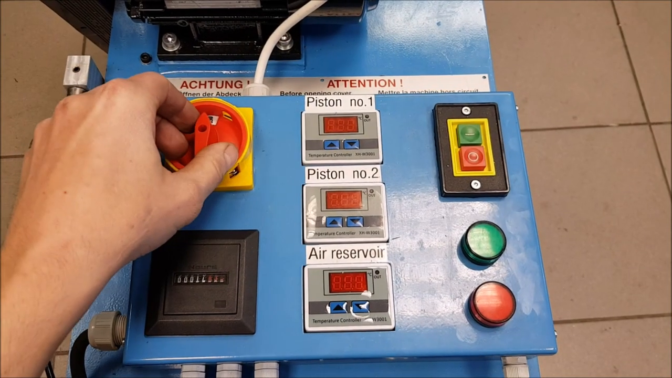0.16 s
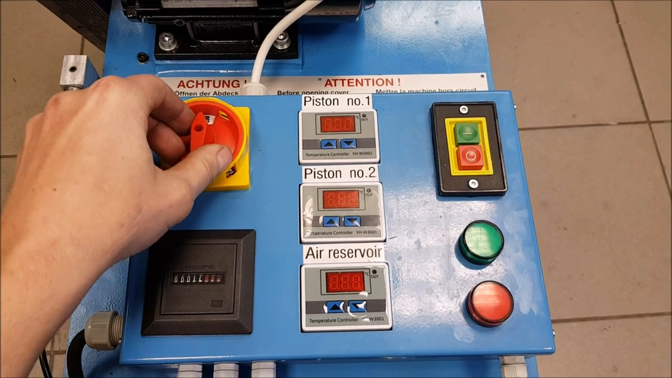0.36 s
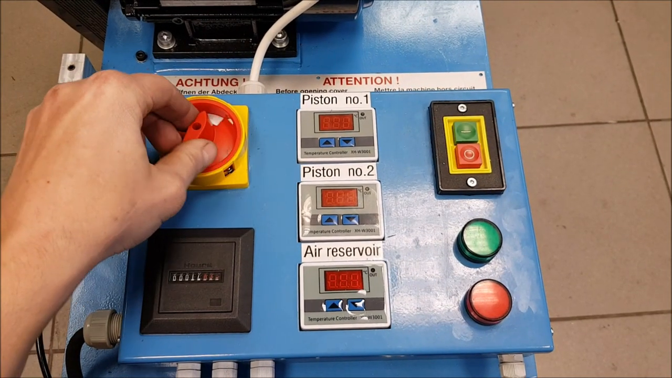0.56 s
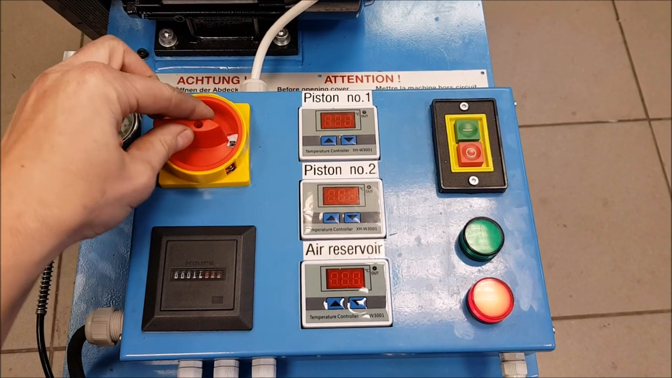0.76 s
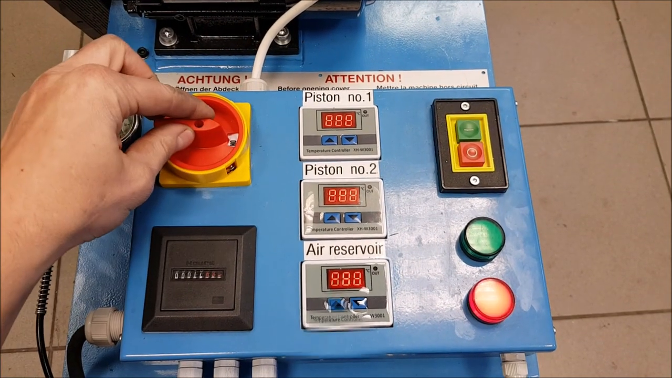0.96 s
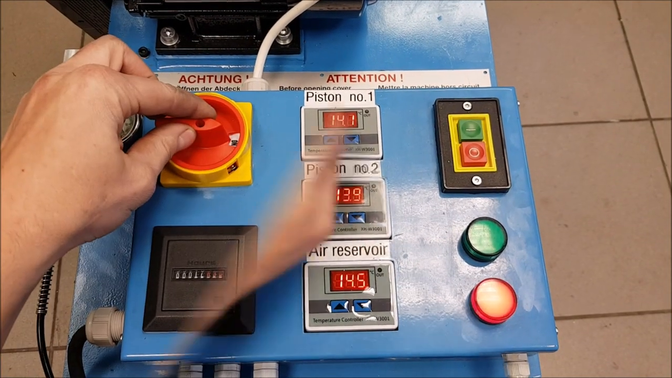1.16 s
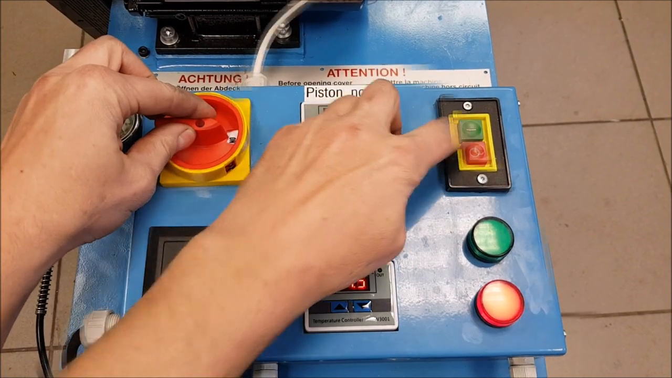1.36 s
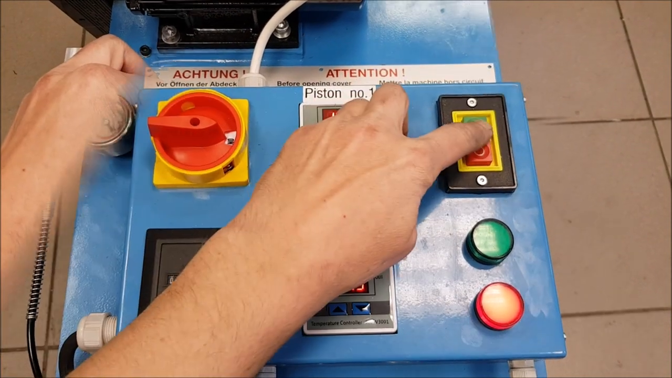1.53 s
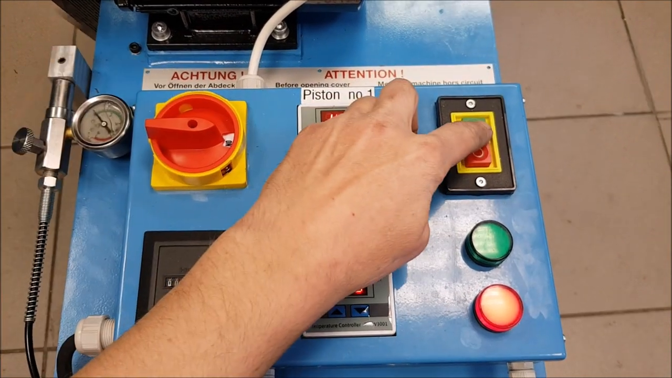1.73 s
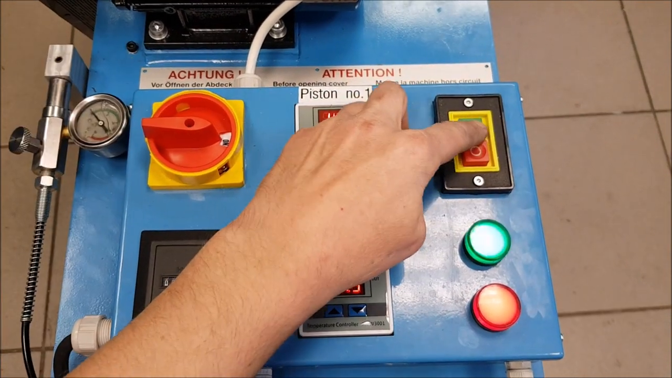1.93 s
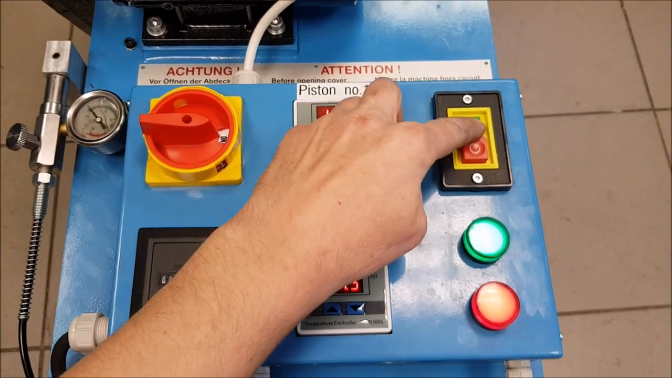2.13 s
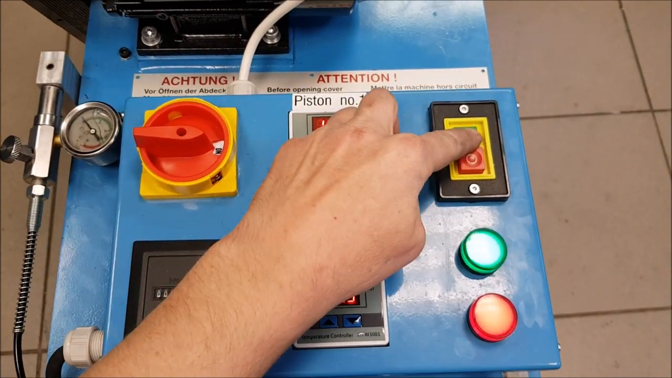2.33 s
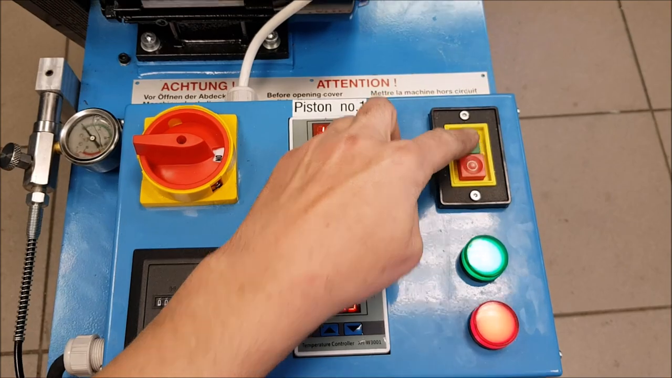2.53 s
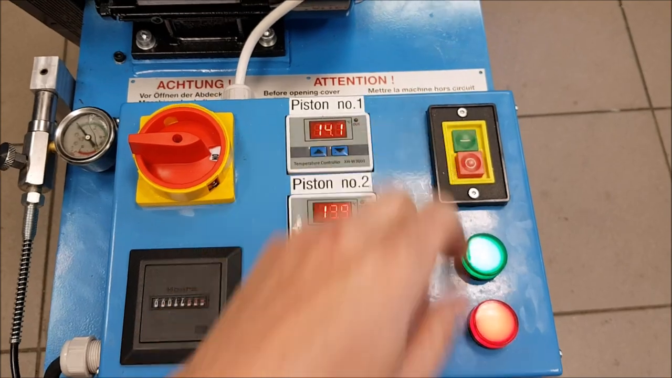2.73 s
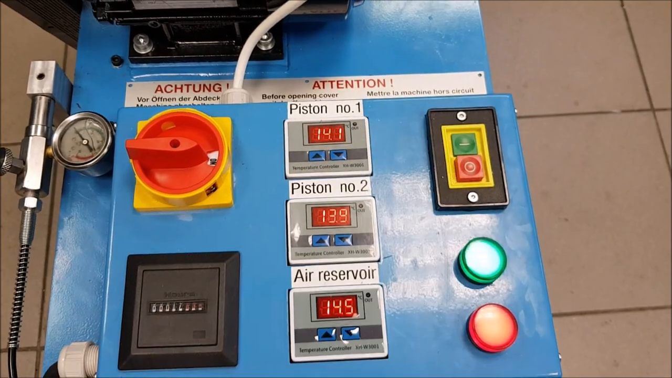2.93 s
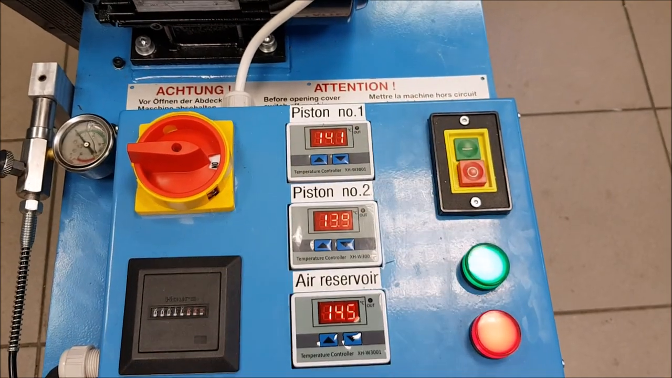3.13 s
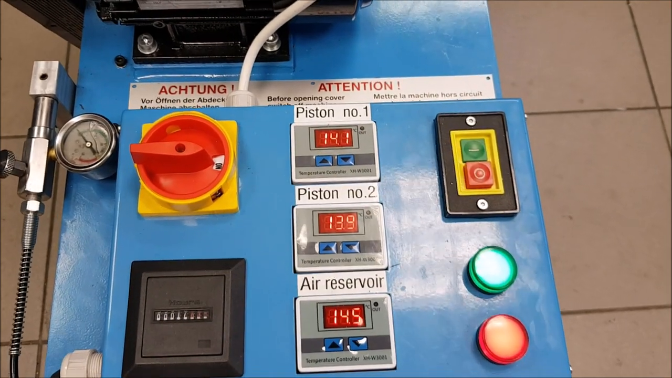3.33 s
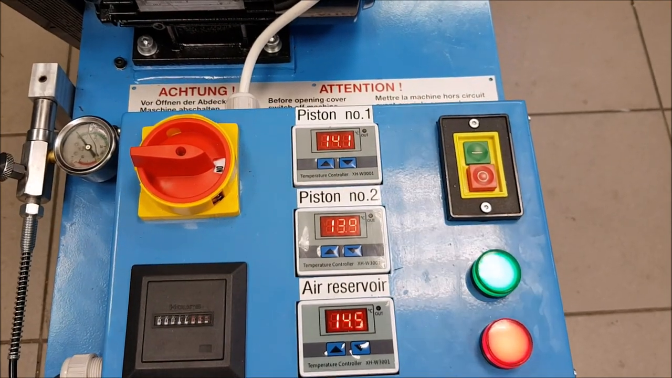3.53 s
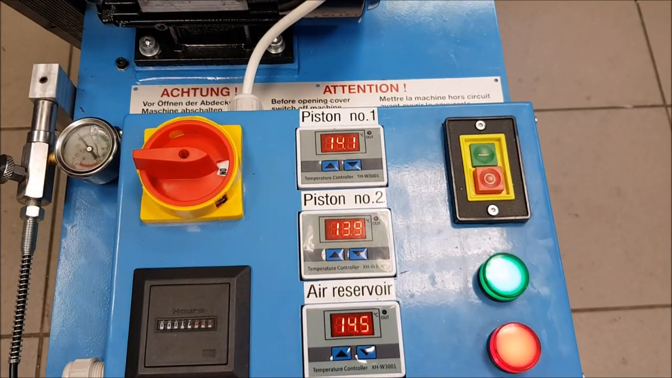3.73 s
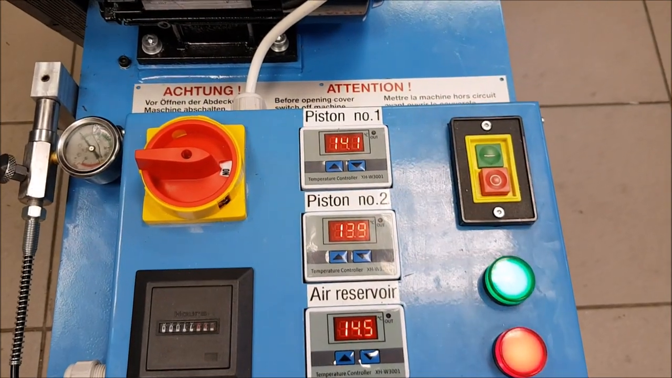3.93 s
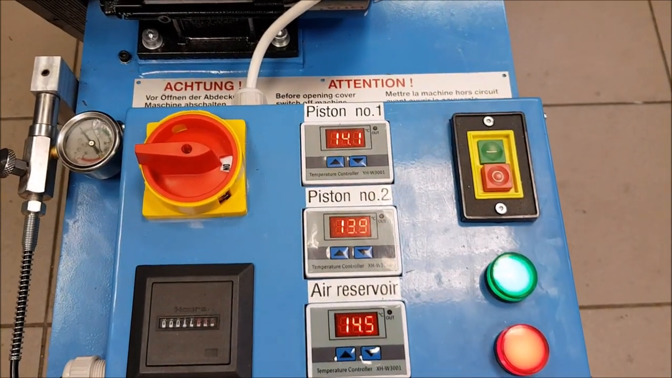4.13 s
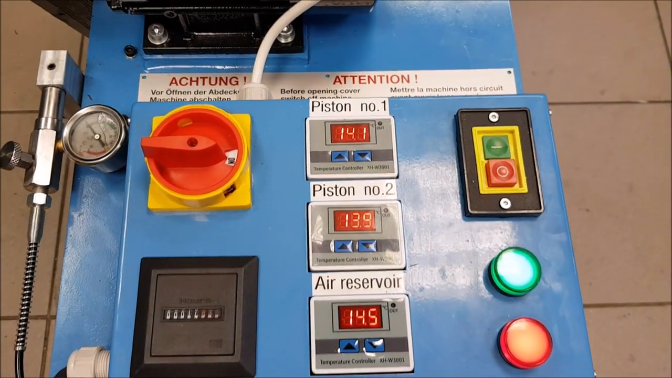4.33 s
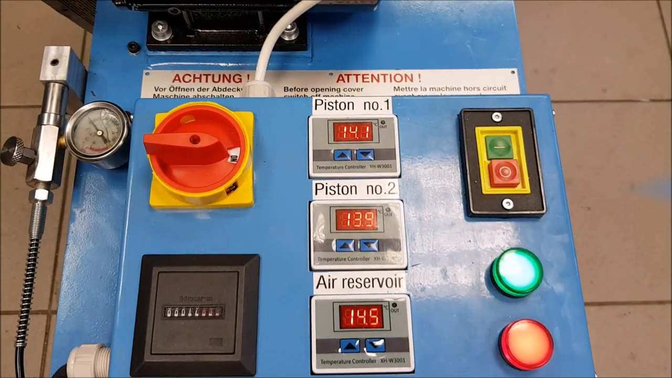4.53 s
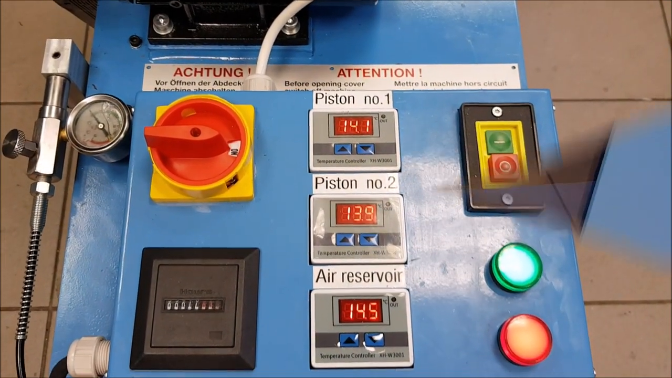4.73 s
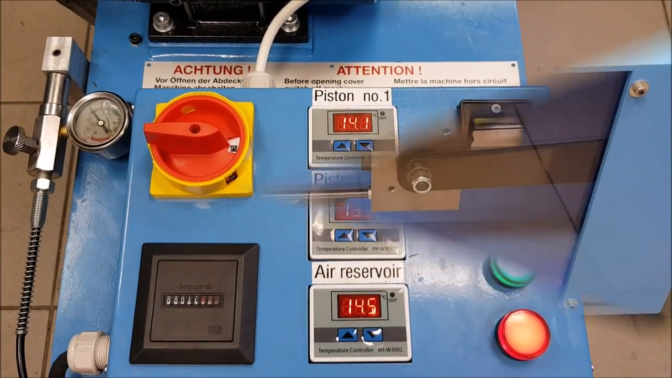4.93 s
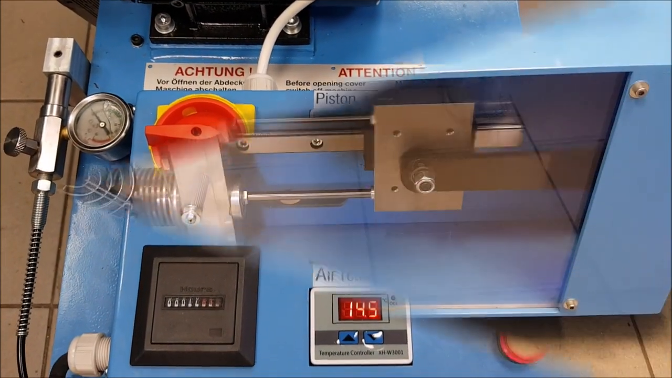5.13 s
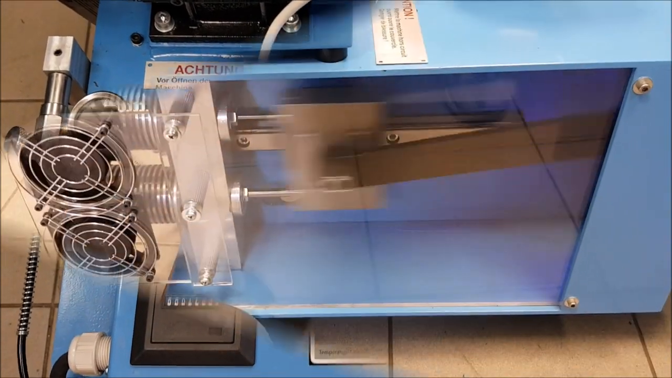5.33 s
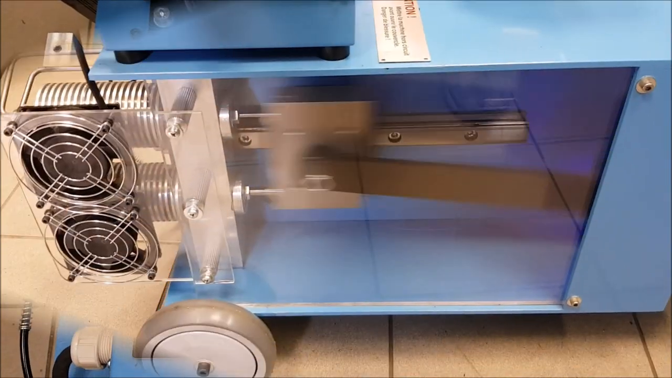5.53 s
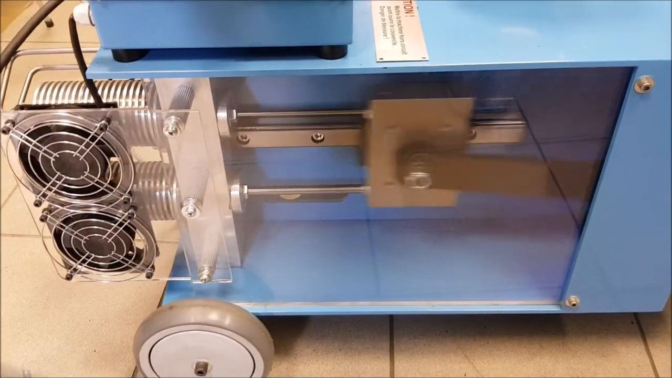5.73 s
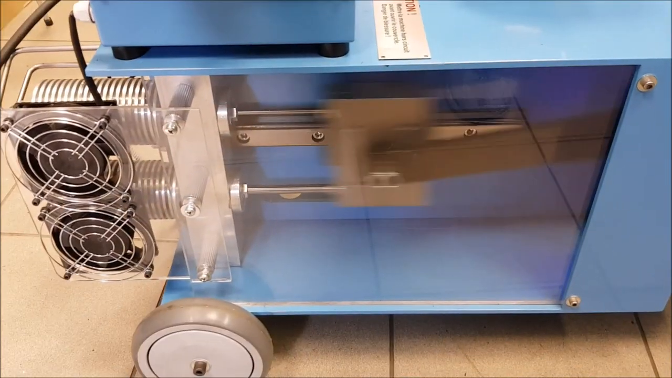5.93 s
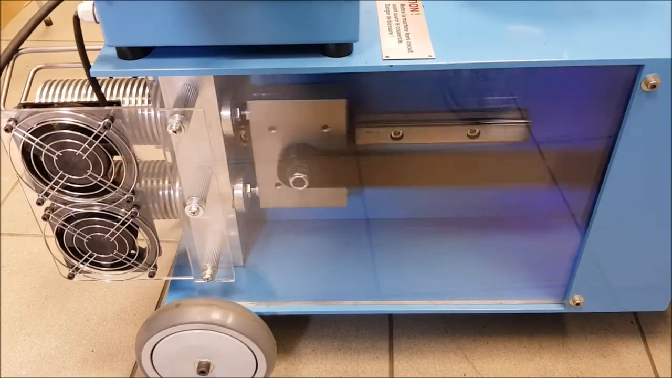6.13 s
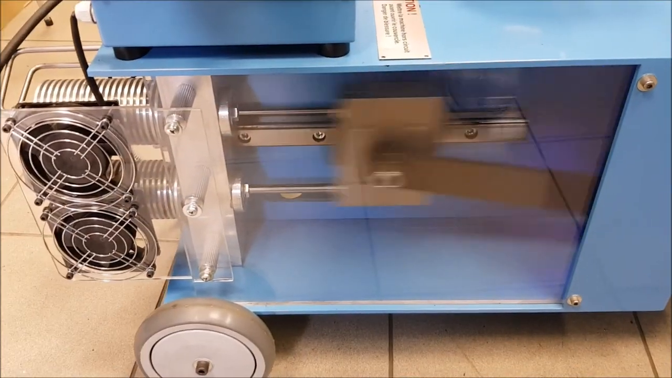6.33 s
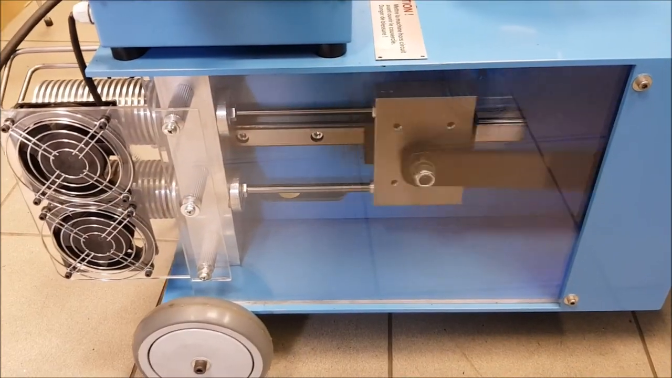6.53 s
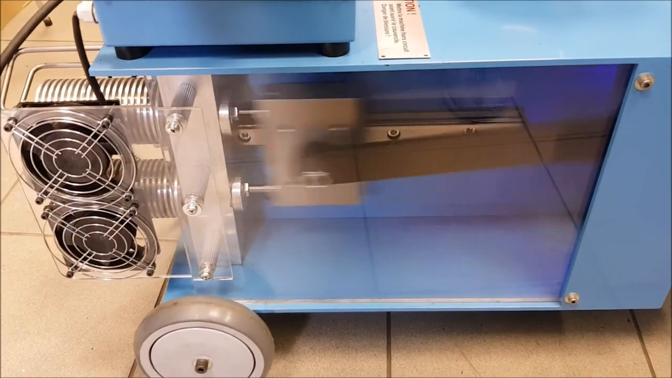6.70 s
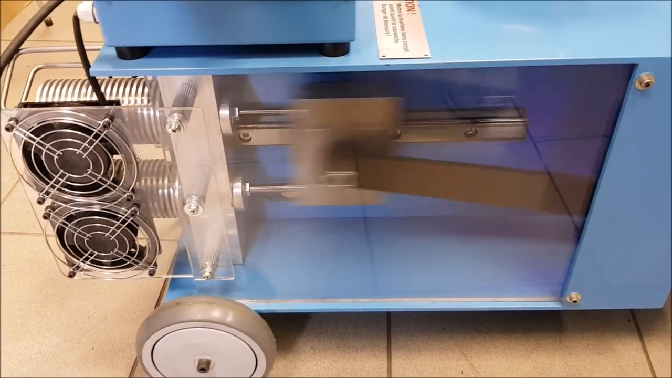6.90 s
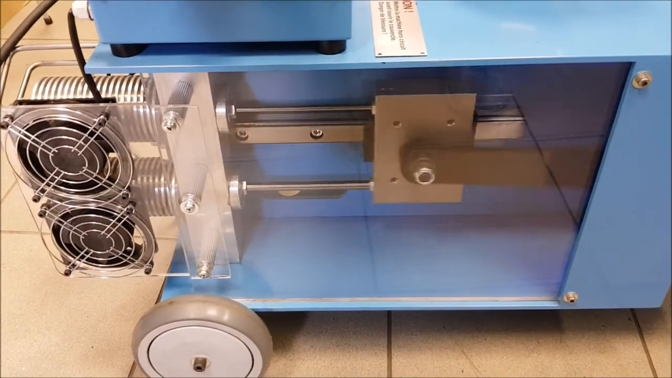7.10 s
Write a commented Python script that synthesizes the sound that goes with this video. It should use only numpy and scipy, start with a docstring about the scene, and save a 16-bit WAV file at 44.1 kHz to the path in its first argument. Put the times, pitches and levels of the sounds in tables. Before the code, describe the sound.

Close handheld stereo in a small hard workshop: almost silent at first, then a knob scrapes and its contacts snap loudly. Soft low thuds follow as a button is pressed. At about two seconds a piston compressor starts almost instantly, its buzzing gear hum and metallic clatter repeating about three and a half times a second. Near five seconds the microphone shifts to the moving rod, bringing a rougher rattle and sharp air spits.

```python
"""Workshop: a rotary main switch creaks and snaps over, a finger thuds on the start button, a geared
piston compressor starts and runs. Its tooth mesh hums and rattles with the load of each stroke, the rod
knocks as its play closes and a valve spits once a turn: sines, ringing modes and shaped noise.
The hand-held microphone moves from over the control panel to the open crank side."""
import sys
import numpy as np
from scipy import signal
from scipy.fft import rfft, irfft, next_fast_len
from scipy.io import wavfile
from scipy.ndimage import map_coordinates

SR = 44100
rng = np.random.default_rng(int(sys.argv[2]) if len(sys.argv) > 2 else 0)


def inscribe(sig):
    """Save sig as 16-bit PCM at rate SR to the path in sys.argv[1].

    A 1-D sig is mono; a 2-D sig holds one channel per row.
    Samples are clipped to [-1, 1] before scaling.
    """
    pcm = np.round(np.clip(np.atleast_2d(sig).T, -1, 1) * 32767)
    wavfile.write(sys.argv[1], SR, pcm.astype(np.int16))


N = 320166
TIME = np.arange(N) / SR
TURN_S, DEAD_CENTRE_S = .2832, 2.071  # one crank turn, a dead centre
TEETH = 70  # tooth contacts per crank turn
FULL_SPEED_S = 2.012
TOP_HZ = 15900


def amp(db):
    """Decibels to gain."""
    return 10 ** (np.asarray(db) / 20)


def unit(x):
    """Scaled to rms 1."""
    return x / np.sqrt(np.mean(x ** 2) + 1e-20)


def along(points, hz):
    """(hz, value) points interpolated on a log axis."""
    point_hz, value = np.transpose(points)
    return np.interp(np.log(hz + 1), np.log(point_hz + 1), value)


def curves(rows):
    """One value per sample for each column after the time."""
    time_s, *columns = np.transpose(rows)
    return [np.interp(TIME, time_s, column) for column in columns]


def wobble(rate_hz):
    """Smooth random curve, rate_hz knots a second."""
    return map_coordinates(rng.standard_normal(int(N * rate_hz / SR) + 4), [TIME * rate_hz])


def filtered(x, response):
    """x times a response of frequency."""
    size = next_fast_len(N + SR // 2)
    return irfft(rfft(x, size) * response(np.fft.rfftfreq(size, 1 / SR)), size)[..., :N]


# Left-right likeness of the noise: hz, likeness [0..1]
LIKENESS = [(60, 0.99), (130, 0.87), (260, 0.8), (500, 0.64), (800, 0.86), (1200, 0.078), (1800, 0.002),
            (3000, 0), (15000, 0.046)]


def stereo_noise():
    """White noise, alike in both ears in the bass, nearly unrelated in the treble."""
    def mid_side(hz):
        turn = np.arccos(np.clip(along(LIKENESS, hz), -1, .999)) / 2
        return np.array([np.cos(turn), np.sin(turn)])
    mid, side = filtered(rng.standard_normal((2, N)), mid_side)
    return np.array([mid + side, mid - side])


def shaped(x, spectrum):
    """x filtered by (hz, level_db) points, rms 1."""
    return unit(filtered(x, lambda hz: amp(along(spectrum, hz))))


def noise(spectrum):
    """Coloured stereo noise, rms 1."""
    return shaped(stereo_noise(), spectrum)


def bursts(rows, t60_s, attack_s):
    """Envelope of (start_s, level_db) blows that rise fast and die away; powers add."""
    power, t = np.zeros(N + SR), np.arange(SR // 2) / SR
    for start_s, level_db in rows:
        blow = amp(level_db - 60 * t / t60_s) * (1 - np.exp(-t / attack_s))
        power[round(start_s * SR):][:len(t)] += blow ** 2
    return np.sqrt(power[:N])


# Workshop decay: hz, t60_s
ROOM_DECAY = [(150, 0.34), (1000, 0.19), (4000, 0.27), (9000, 0.25), (15000, 0.11)]


def room(x):
    """Workshop reverberation: noise tail with a decay time per frequency."""
    hz, _, bins = signal.stft(rng.standard_normal((2, SR // 2)), SR, nperseg=256)
    _, t, _ = signal.stft(np.zeros(SR // 2), SR, nperseg=256)
    tail = signal.istft(bins * amp(-60 * t / along(ROOM_DECAY, hz)[:, None]), SR, nperseg=256)[1]
    tail[:, :SR // 250] = 0  # nearest surfaces answer after 4 ms
    return signal.fftconvolve(x, tail / np.linalg.norm(tail[0]), axes=1)[:, :N]


# Faint hiss: hz, level_db
QUIET_SPECTRUM = [(25, -20), (70, -4), (200, -2.5), (500, -14.5), (1100, -14), (1600, -1.5), (2400, -16),
                  (3600, -17.5), (4450, 5), (5300, -12.5), (6600, 3), (8500, -16.5), (10800, 10.5),
                  (11800, -3.5), (15800, -1.5)]
QUIET_DB = -61.5


def quiet_room():
    """Steady coloured noise: the room's faint hiss."""
    return amp(QUIET_DB) * noise(QUIET_SPECTRUM)


def creaking(spectrum):
    """Quick uneven stick-slips ring the plastic's resonances; rms 1."""
    slips = np.cumsum(110 * amp(3.5 * wobble(55))) / SR
    return shaped(stereo_noise() * np.exp(-4 * (slips % 1)), spectrum)


RUB_ATTACK_S, RUB_T60_S = 0.0071, 0.079


def strokes(rows):
    """Envelope of (start_s, length_s, level_db) rubs: attack, hold, release."""
    envelope = 0
    for start_s, length_s, level_db in rows:
        attack = 1 - np.exp(-np.maximum(TIME - start_s, 0) / RUB_ATTACK_S)
        release_s = np.maximum(TIME - start_s - length_s, 0)
        envelope = envelope + amp(level_db - 60 * release_s / RUB_T60_S) * attack
    return envelope


# Fingers and cam rubbing on the plastic knob: start_s, length_s, level_db
KNOB_RUBS = [(.105, .035, -71.5), (.493, .04, -55.5), (.551, 0.046, -51.5), (.735, .012, -52)]
# Cam creak: hz, level_db
CAM_SPECTRUM = [(60, -50), (190, -14), (320, 5), (480, -14), (850, 4), (1150, -3), (1450, 1), (1700, -3),
                (2050, 4), (2700, -12), (7000, -16), (15000, -28)]
# Cam scraping over its detents: start_s, length_s, level_db
DETENT_RUBS = [(.555, 0.067, -53), (.655, 0.11, -61)]
# Detent scrape: hz, level_db
DETENT_SPECTRUM = [(400, -25.5), (950, -9.5), (1500, -9), (2050, -1), (2700, -16.5), (3500, -9.5),
                   (12000, -18.5)]
# Main switch and start button clicks: start_s, level_db, brightness [0 dull body .. 1 bright snap]
SWITCH_CLICKS = [(.748, -20.5, 0.98), (0.756, -29, .42), (.76, -25, 0.54), (0.761, -23.5, .16),
                 (0.768, -31.5, 0.58), (1.776, -68, .12)]
# Contact snap: hz, level_db
SNAP_SPECTRUM = [(300, -40), (1800, -26), (2800, -5.5), (3900, 2), (5200, -8), (7200, -0.5), (9000, -10),
                 (11000, -11), (15800, -18)]
# Switch housing: hz, level_db
HOUSING_SPECTRUM = [(30, -66), (90, -40), (170, -13), (280, -1), (450, -13), (800, -3), (1150, 0),
                    (1520, 3), (2100, -7), (3400, -9), (5200, -13), (8000, -18), (15800, -25)]
HOUSING_CUT_HZ = 140  # the small housing radiates little bass


def main_switch():
    """Cam creaks over its detent, contacts snap in their housing, the spring rings on as a sine."""
    creak = strokes(KNOB_RUBS) * creaking(CAM_SPECTRUM) + strokes(DETENT_RUBS) * creaking(DETENT_SPECTRUM)
    # brightness splits each click's power
    bright = [(s, db + 10 * np.log10(np.clip(snap, 1e-3, 1))) for s, db, snap in SWITCH_CLICKS]
    dull = [(s, db + 10 * np.log10(np.clip(1 - snap, 1e-3, 1))) for s, db, snap in SWITCH_CLICKS]
    snaps = amp(9.0) * noise(SNAP_SPECTRUM) * bursts(bright, t60_s=0.009, attack_s=0.00028)
    body = amp(4.5) * noise(HOUSING_SPECTRUM) * bursts(dull, t60_s=0.041, attack_s=0.00093)
    high_pass = signal.butter(3, HOUSING_CUT_HZ, "high", fs=SR, output="sos")
    plastic = signal.sosfilt(high_pass, creak + snaps + body)
    spring = bursts([(.76, -60.5)], t60_s=0.84, attack_s=.002) * np.sin(2 * np.pi * 1702 * TIME)
    return plastic + amp(-6.5) * room(plastic) + spring


# Finger on the start button: start_s, level_db
FINGER_THUDS = [(1.505, -70), (1.708, -52.5), (1.742, -47.5), (1.808, -52.5), (1.878, -58)]
# Thud: hz, level_db
THUD_SPECTRUM = [(25, 1), (70, 12), (170, 4), (350, -11), (650, -20.5), (2000, -31), (6000, -55)]
# Hand shifting its grip on the microphone: start_s, level_db
GRIP_BUMPS = [(4.495, -36), (6.06, -37)]
# Bump: hz, level_db
BUMP_SPECTRUM = [(25, -6), (60, 8), (120, 4), (250, -20), (1000, -50)]


def hands():
    """Soft low noise bursts: finger on the panel, grip on the microphone."""
    thuds = noise(THUD_SPECTRUM) * bursts(FINGER_THUDS, t60_s=0.23, attack_s=0.0059)
    bumps = noise(BUMP_SPECTRUM) * bursts(GRIP_BUMPS, t60_s=0.15, attack_s=0.006)
    return thuds + bumps


# Clack of contactor, and of frame under the knocks: hz, level_db
CLACK_SPECTRUM = [(150, -82), (500, -24), (800, 7.5), (1100, -2), (1600, 6), (2200, -14), (3200, -13),
                  (6000, -25), (15000, -22)]
# Motor contactor pulling in behind the panel: start_s, level_db
CONTACTOR_CLACKS = [(1.977, -45)]
# Sharp drive ticks, mostly as it jerks into motion: start_s, level_db
JERK_TICKS = [(2.002, -34), (2.018, -44), (2.039, -28), (2.069, -24), (2.076, -23), (2.093, -22),
              (5.2145, -16.5)]
# Drive tick: hz, level_db
JERK_SPECTRUM = [(4000, -14), (7000, -10), (9500, -9.5), (13000, -9), (15800, -15)]
# Dry seal on its first strokes: start_s, level_db
SEAL_SQUEAKS = [(2.143, -29), (2.243, -36)]


def start_up():
    """Contactor clack and drive ticks as noise bursts, dry seal squeak as an unsteady sine."""
    clack = noise(CLACK_SPECTRUM) * bursts(CONTACTOR_CLACKS, t60_s=0.11, attack_s=.004)
    ticks = noise(JERK_SPECTRUM) * bursts(JERK_TICKS, t60_s=.014, attack_s=.0003)
    tone = np.sin(2 * np.pi * 5200 * TIME + 1.0 * wobble(150))
    squeak = bursts(SEAL_SQUEAKS, t60_s=0.1, attack_s=0.0054) * tone
    dry_start = clack + ticks + squeak
    return dry_start + amp(-9.5) * room(dry_start)


# Tooth load surges per turn: centre_turns, half_width_turns, panel_db, crank_db
LOAD_SURGES = [(.11, 0.094, -2, -3.5), (.275, 0.097, -1.4, 2.5), (.48, 0.088, -24, 0),
               (.605, 0.082, -2.5, -10), (.81, .075, -12.5, 0.5)]
IDLE_LOAD_DB = -29  # between surges
SURGE_EDGE = 4.3  # squareness, 2 = bell


def tooth_load(angle, place):
    """Tooth load in dB: the same rounded surges every turn, as they carry to the microphone."""
    power = amp(IDLE_LOAD_DB) ** 2
    for centre_turns, half_width_turns, panel_db, crank_db in LOAD_SURGES:
        away_turns = (angle - centre_turns + .5) % 1 - .5
        carried = (1 - place) * amp(panel_db) ** 2 + place * amp(crank_db) ** 2
        power = power + carried * np.exp(-np.abs(away_turns / half_width_turns) ** SURGE_EDGE)
    return 10 * np.log10(power)


RACE_SHARE, RACE_AT_TURNS, RACE_TURNS = 0.0691, .455, 0.0347  # speed gain at each reversal, start, time to peak
SAG_SHARE = 0.012  # speed lost per unit of load gain


def crank():
    """Crank angle and tooth count: the motor slows under load and races when the load lets go."""
    angle = (TIME - DEAD_CENTRE_S) / TURN_S
    released = (angle - RACE_AT_TURNS) % .5 / RACE_TURNS
    race = RACE_SHARE * released * np.exp(1 - released)
    speed = 1 + race - SAG_SHARE * amp(tooth_load(angle, np.zeros(N)))
    tooth = np.cumsum(speed / speed.mean()) * TEETH / TURN_S / SR + .035 * wobble(14)
    return angle, tooth


GROWL_DB, GROWL_SWING_DB, GROWL_PEAK_TURNS = -30.5, 4.5, 0.34  # octave below the mesh tone


def gear_hum(angle, tooth, load_db, place):
    """Mesh tone swells with tooth load; alternate teeth differ and add the octave below."""
    phase = 2 * np.pi * tooth
    swell = amp(load_db + 0.21 * wobble(50) + 2 * place * wobble(55))
    second = amp(-26.5) * np.sin(2 * phase + 0.86 * wobble(30))
    third = amp(-14.5) * np.sin(3 * phase + 1.3 * wobble(50))
    mesh = swell * (np.sin(phase + 1.16 * place * wobble(50)) + second + third)
    # the frame hardly radiates below its panel resonance
    mesh = filtered(mesh, lambda hz: 1 - 1 / (1 + (hz / 212) ** 20))
    growl_swing_db = GROWL_SWING_DB * np.cos(2 * np.pi * (angle - GROWL_PEAK_TURNS))
    growl_db = GROWL_DB + growl_swing_db + 6 * place + 1.7 * wobble(19)
    growl = amp(growl_db) * np.sin(phase / 2 + 1.8 * wobble(16))
    return np.sqrt(2) * (mesh + growl) * amp([[-.3], [.3]])


def tooth_scrapes(tooth, sharpness, scatter_db, repeat):
    """Each tooth strikes and scrapes; a share of the grain's power repeats every crank turn."""
    index = np.floor(tooth + 1).astype(int)
    size = amp(scatter_db * rng.standard_normal(index.max() + 1))[index]
    worn = stereo_noise()[:, np.arange(N) % round(TURN_S * SR)]
    grain = np.sqrt(repeat) * worn + np.sqrt(1 - repeat) * stereo_noise()
    return unit(size * np.exp(-sharpness * (tooth % 1)) * grain)


# Gearbox and frame modes: mode_hz, width_hz, panel_db, crank_db
CASING_MODES = [(126, 13, -5, -3), (273, 34, 4.5, 4.5), (344, 8.7, 2.5, 1), (497, 4.7, -30, -1.5),
                (747, 59, 2.5, -2), (914, 63, -1, -8.5), (1200, 390, -10.5, -7.5), (1633, 69, 2.5, -5),
                (2234, 126, -12, -54), (4748, 26, -11, -18), (5200, 34, -14, -21), (5420, 66, -18.5, -49),
                (7000, 70, -28, -37), (10600, 100, -23, -36)]
# Casing plates between the modes: hz, level_db
PLATE_SPECTRUM = [(30, -62), (90, -42), (200, -32), (450, -29), (600, -7), (1000, -17.5), (1700, -44),
                  (2300, -46), (3200, -42), (6000, -51), (15000, -60)]


def gear_rattle(tooth, place):
    """Teeth ring the casing, whose modes carry differently to the panel and the crank side."""
    drive = tooth_scrapes(tooth, sharpness=0.24, scatter_db=1.0, repeat=0.52)

    def casing(hz, side):
        total = amp(along(PLATE_SPECTRUM, hz)) ** 3
        for mode_hz, width_hz, *side_db in CASING_MODES:
            resonance = hz * width_hz / (mode_hz ** 2 - hz ** 2 + 1j * hz * width_hz)
            total = total + np.abs(amp(side_db[side]) * resonance) ** 3
        return total ** (1 / 3) * (hz / np.hypot(hz, 75)) ** 2

    over = unit(filtered(drive, lambda hz: casing(hz, 0)))
    beside = unit(filtered(drive, lambda hz: casing(hz, 1)))
    return over + place * (beside - over)


def with_speed(x, tooth):
    """Pitch sags and rises with gear speed: x is read by the tooth count."""
    clock = (tooth - tooth[0]) * TURN_S / TEETH * SR
    return np.array([map_coordinates(channel, [clock], mode="nearest") for channel in x])


# Fan and intake hiss: hz, level_db
AIR_SPECTRUM = [(1650, -14.5), (2800, -0.5), (3330, -23), (3910, -13.5), (4170, -4.5), (5070, 0),
                (5950, -4), (6820, -0.5), (9180, -6), (10600, 0), (12500, -3.5), (15100, -2.5),
                (15800, -6.5)]
# Bright tick of each tooth: hz, level_db
TOOTH_TICK_SPECTRUM = [(6000, -32), (9800, -22), (10600, 2), (11600, -1.5), (12700, 8), (14000, -16),
                       (15800, -5.5)]
# Piston seal rub: hz, level_db
SEAL_SPECTRUM = [(3000, -25.5), (3600, -4.5), (3860, 7.5), (4020, -1), (4400, -4), (5200, -16),
                 (7000, -35.5)]


def air(angle, tooth, place):
    """Fan hiss with two intake puffs a turn, bright tooth ticks, seal rub swelling with the stroke."""
    def puff(start_turns, life_turns):
        return np.exp(-((angle - start_turns) % 1) / life_turns)

    hiss_scrapes = tooth_scrapes(tooth, sharpness=0.2, scatter_db=1.0, repeat=0.0776)
    tick_scrapes = tooth_scrapes(tooth, sharpness=3.8, scatter_db=3.5, repeat=0.28)
    breath_db = 8.3 * (1 - place) * puff(0.783, 0.15) + 3.5 * puff(1.0, 0.41) - 4.5
    breeze = amp(breath_db) * shaped(hiss_scrapes, AIR_SPECTRUM)
    ticks = amp(-7.0 - 7.2 * place) * shaped(tick_scrapes, TOOTH_TICK_SPECTRUM)
    stroke_db = 2.4 * np.cos(2 * np.pi * (angle - .2)) + 1.1 * np.cos(4 * np.pi * (angle - .15))
    rub_db = -9 + 3 * place + stroke_db + 2.44 * wobble(60)
    return breeze + ticks + amp(rub_db) * noise(SEAL_SPECTRUM)


def every_turn(share):
    """Times in s at which the running crank passes this share of its turn."""
    times_s = DEAD_CENTRE_S + (np.arange(-1, TIME[-1] / TURN_S) + share) * TURN_S
    return times_s[(times_s > FULL_SPEED_S - TURN_S / 20) & (times_s < TIME[-1])]


# Play closing in every turn, rebound on the return: at_turns, panel_db, crank_db
PLAY_KNOCKS = [(.439, -15.5, -31.5), (.642, -24, -21), (.816, -16, -26), (.842, -21, -33)]
# Rod and crosshead modes: mode_hz, level_db, t60_s
ROD_MODES = [(779.7, -5.5, 0.19), (858.6, -3.5, 0.1), (904, 1.5, 0.048), (1168, -2.5, 0.03),
             (1355, -13, 0.31), (1493, -14.5, 0.092), (1643, -10, 0.14), (1713, -21, 0.052),
             (2204, -17.5, 0.17)]
KNOCK_SCATTER_DB = 0.3


def knocks(place):
    """Rod play closes: rod modes ring at new strengths each time and the frame clatters after."""
    blows = []
    for at_turns, panel_db, crank_db in PLAY_KNOCKS:
        for start_s in every_turn(at_turns):
            heard_db = panel_db + np.interp(start_s, TIME, place) * (crank_db - panel_db)
            blows.append((start_s, heard_db + KNOCK_SCATTER_DB * rng.standard_normal()))
    ring, t = np.zeros((2, N + SR)), np.arange(SR // 8) / SR
    mode_hz, mode_db, t60_s = np.transpose(ROD_MODES)[..., None]
    for start_s, blow_db in blows:
        scatter_db = 1.3 * rng.standard_normal((2, len(ROD_MODES), 1))
        strength = amp(blow_db + mode_db + scatter_db) * rng.choice([-1, 1], mode_hz.shape)
        blow_hz = mode_hz * (1 + 0.014 * rng.standard_normal(mode_hz.shape))
        modes = np.sin(2 * np.pi * blow_hz * t) * amp(-60 * t / t60_s)
        ring[:, round(start_s * SR):][:, :len(t)] += (strength * modes).sum(1) * (1 - np.exp(-t / 0.0011))
    fading = bursts(blows, t60_s=.09, attack_s=.0018) * amp(2 * wobble(300))
    clack = amp(-9.5) * ring[:, :N] + amp(-5.5) * noise(CLACK_SPECTRUM) * fading
    return clack + amp(-4.5) * room(clack)


LULL_DB, LULL_HALF_WIDTH_TURNS, LULL_LEAD_TURNS = -1.5, 0.1, 0.071


def lull_db(angle, place):
    """Rattle eases while the rod crosses its play before a knock, more before a harder one."""
    hardest_db = max(panel_db for _, panel_db, _ in PLAY_KNOCKS)
    lull = 0
    for at_turns, panel_db, crank_db in PLAY_KNOCKS:
        away_turns = (angle - at_turns + LULL_LEAD_TURNS + .5) % 1 - .5
        hardness = amp(panel_db + place * (crank_db - panel_db) - hardest_db)
        lull = lull + hardness * np.exp(-(away_turns / LULL_HALF_WIDTH_TURNS) ** 2)
    return LULL_DB * lull


# Valve spit: hz, level_db
VALVE_SPECTRUM = [(400, -25), (950, 7.5), (1500, 0), (2500, -1.5), (4500, -6.5), (7000, -0.5), (9000, -4),
                  (12000, 0.5), (15500, -12.5)]
VALVE_DB = -17
VALVE_HIDDEN_DB, VALVE_OPEN_PLACE = -57, 0.45  # frame screens it from the panel, up to this place


def valves(place):
    """Delivery valve snaps open once a turn: a sharp tick and a short spit of air."""
    screen_db = VALVE_HIDDEN_DB * np.clip(1 - place / VALVE_OPEN_PLACE, 0, 1)
    snaps = [(s, VALVE_DB + np.interp(s, TIME, screen_db)) for s in every_turn(0)]
    tick = amp(-3.5) * bursts(snaps, t60_s=0.021, attack_s=0.00031)
    puff = amp(-7.0) * bursts(snaps, t60_s=0.097, attack_s=0.0061)
    spit = noise(VALVE_SPECTRUM) * (tick + puff)
    return spit + amp(-11) * room(spit)


# Left minus right over the panel: hz, difference_db
PANEL_LEAN = [(100, 3), (250, 0), (700, 1), (1250, -3.5), (1700, -11), (2400, -1.5), (4400, 1),
              (15000, 1.5)]


def leaning(x, place):
    """Left-right balance by frequency, weaker beside the crank."""
    over = filtered(x, lambda hz: amp(np.outer([.5, -.5], along(PANEL_LEAN, hz))))
    return over + 0.51 * place * (x - over)


OVERSHOOT_DB, SETTLE_S = 3, .2  # louder at first, then settles


def running_db(layer, place):
    """Layer level: rises as the motor starts, overshoots, settles, changes with place."""
    panel_db, beside_db, rise_db_per_s = layer
    since_s = TIME - FULL_SPEED_S
    rise_db = rise_db_per_s * np.minimum(since_s, 0)
    overshoot_db = OVERSHOOT_DB * np.exp(-np.maximum(since_s, 0) / SETTLE_S)
    return panel_db + beside_db * place + rise_db + overshoot_db


# Microphone path: time_s, place [0 over panel .. 1 beside crank], nearness_db
MICROPHONE_PATH = [(5.14, 0.033, 0.5), (5.21, .6, 5), (5.85, 0.41, 3), (6.05, 0.4, 4), (6.1, 0.96, -0.4),
                   (7.26, 1, 0.3)]
# Mesh hum level: panel_db, beside_change_db, rise_db_per_s
HUM_LEVEL = (-21.5, -5.5, 3400)
# Gear rattle level: panel_db, beside_change_db, rise_db_per_s
RATTLE_LEVEL = (-27, -1.26, 860)
# Air level: panel_db, beside_change_db, rise_db_per_s
HISS_LEVEL = (-38, 1.3, 1500)
RATTLE_FOLLOWS = 0.068  # dB of rattle per dB of tooth load


def compressor():
    """Hum, rattle, knocks and air follow the crank; microphone place sets their balance."""
    angle, tooth = crank()
    place, near_db = curves(MICROPHONE_PATH)
    load_db = tooth_load(angle, place)
    hum = amp(running_db(HUM_LEVEL, place)) * gear_hum(angle, tooth, load_db, place)
    stroke_db = RATTLE_FOLLOWS * load_db + lull_db(angle, place) + 0.4 * wobble(30)
    rattle_gain = amp(running_db(RATTLE_LEVEL, place) + stroke_db)
    rattle = rattle_gain * with_speed(gear_rattle(tooth, place), tooth)
    hiss = amp(running_db(HISS_LEVEL, place)) * air(angle, tooth, place)
    machine = hum + leaning(rattle + knocks(place) + hiss, place)
    return amp(near_db) * machine + valves(place)


def scene():
    """Faint room hiss, switch, hands, start-up and running machine."""
    return quiet_room() + main_switch() + hands() + start_up() + compressor()


def record(dry):
    """Removes everything from TOP_HZ up."""
    return filtered(dry, lambda hz: hz < TOP_HZ)


dry = scene()
out = record(dry)
inscribe(out)
```